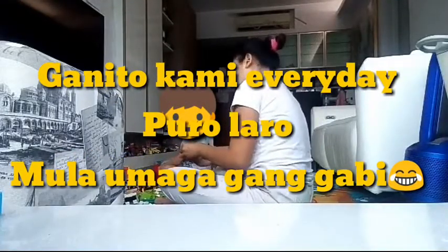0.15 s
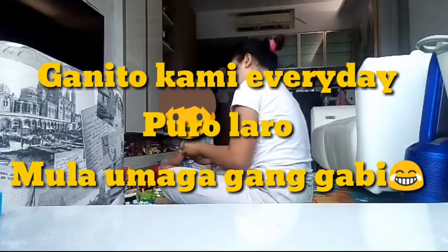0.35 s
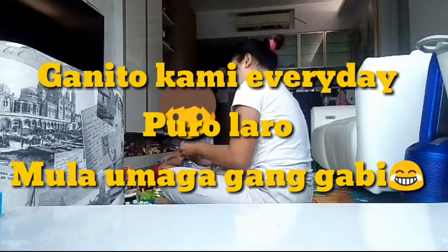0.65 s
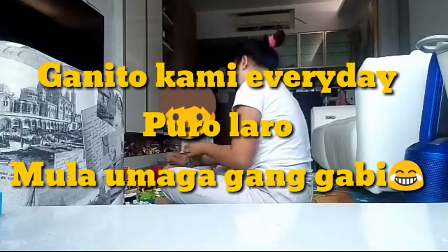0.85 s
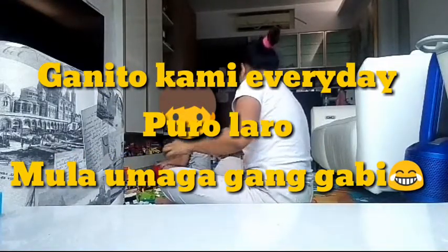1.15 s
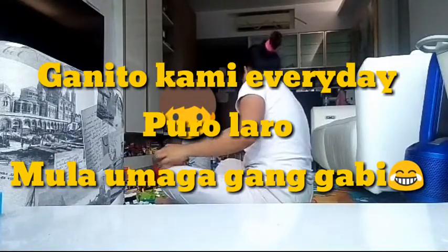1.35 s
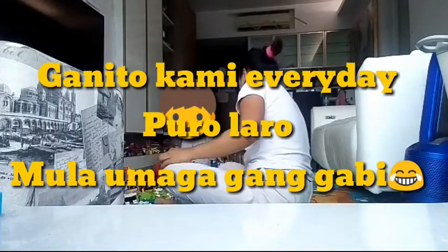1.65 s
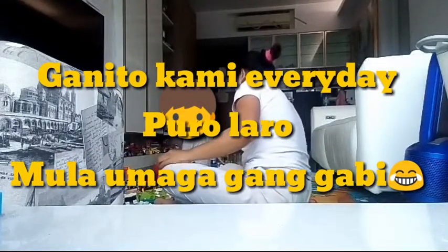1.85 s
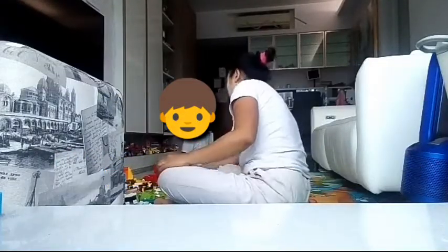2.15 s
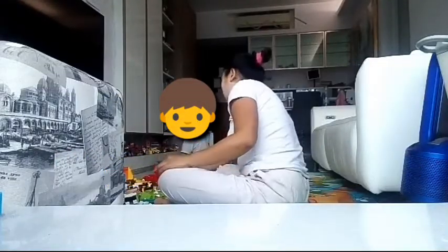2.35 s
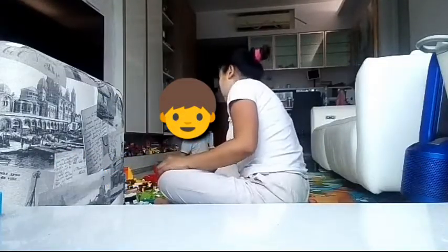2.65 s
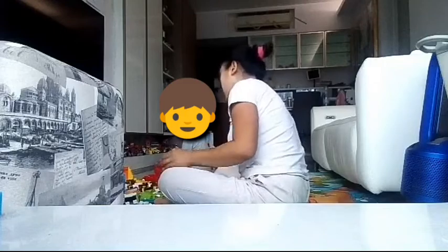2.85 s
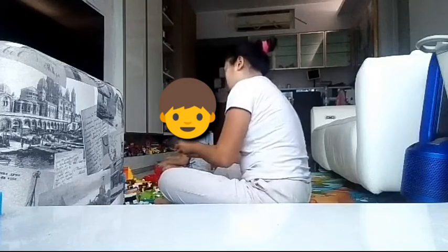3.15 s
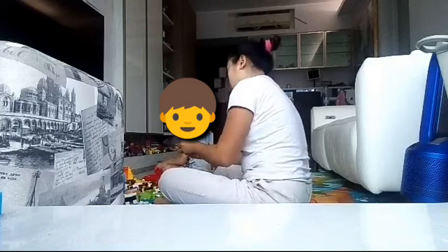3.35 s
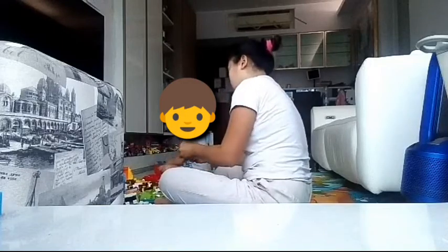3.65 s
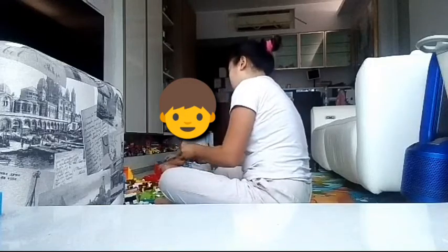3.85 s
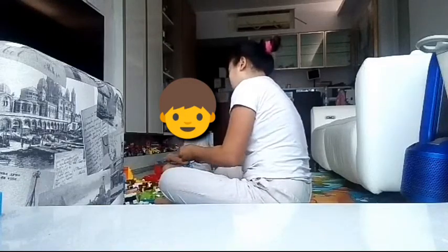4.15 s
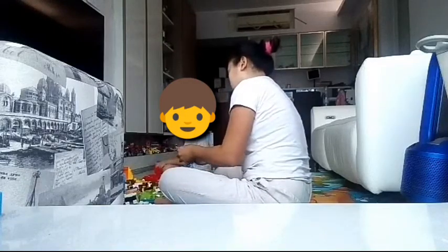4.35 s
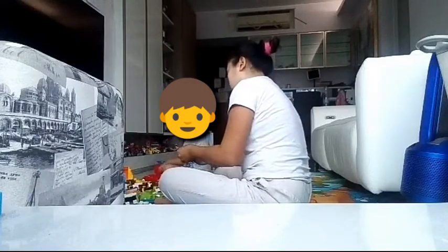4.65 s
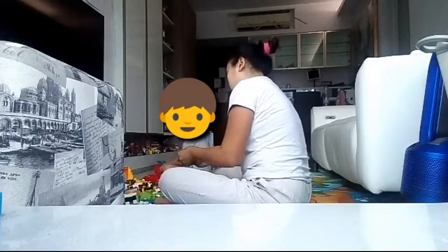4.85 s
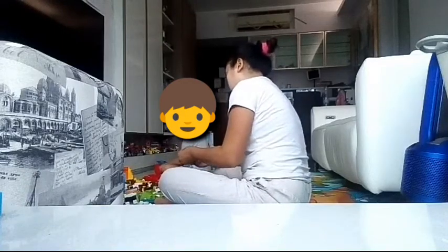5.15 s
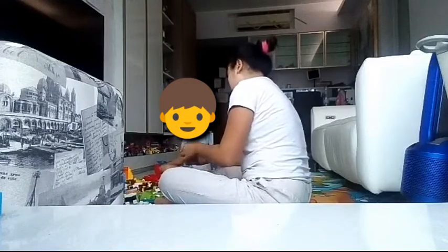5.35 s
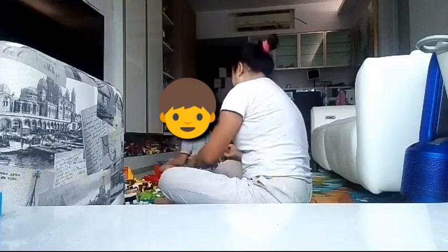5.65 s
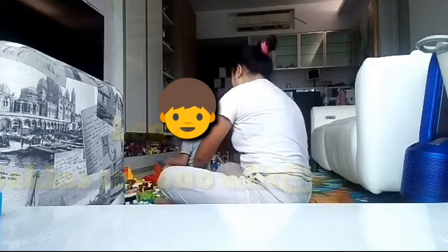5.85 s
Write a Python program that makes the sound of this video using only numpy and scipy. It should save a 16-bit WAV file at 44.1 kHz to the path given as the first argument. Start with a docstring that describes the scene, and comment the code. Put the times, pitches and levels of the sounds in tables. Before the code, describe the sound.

Over a steady low rumble of ventilation, plastic building bricks click and clatter in short, irregular bursts. Light ticks and a spill lead to one loud hollow knock, followed by a quick rummage, further little spills and snaps, and a last few knocks. The sound is slightly distant and leans strongly to the left, heard from a table a couple of metres away in a mildly echoing living room.

```python
"""Plastic toy bricks, picked through by hand on a living-room floor, two metres or so from a table.
Each brick cracks on contact and its shell rings briefly: handfuls drop and tumble, single bricks click,
ping or snap together, the pile is stirred and bumped, and now and then a large hollow piece knocks down.
The microphone is a phone on the table, its right port much the weaker. The table edge shades the direct
path, so most treble arrives by the ceiling and walls. Underneath lies a low ventilation rumble."""
import sys
import numpy as np
from scipy import signal
from scipy.fft import rfft, irfft, next_fast_len
from scipy.io import wavfile

SR = 44100
rng = np.random.default_rng(int(sys.argv[2]) if len(sys.argv) > 2 else 0)


def master_out(mix):
    """Clip the mix to full scale and print it as 16-bit PCM to the path in sys.argv[1]."""
    frames = np.transpose(np.atleast_2d(mix))
    ceiling = np.clip(frames, -1, 1)
    pcm = np.round(ceiling * 32767).astype(np.int16)
    wavfile.write(sys.argv[1], SR, pcm)


N = 265288
SPAN = SR // 4  # samples that one dry event may last
T = np.arange(SPAN) / SR

# spectrum of the ventilation: f/Hz, level/dB
AIR_SPECTRUM = [(20, -13.5), (36, -14), (56, 0.5), (90, -4.5), (135, -3.5), (200, -8), (500, -12.5),
                (700, -23.5), (1000, -26), (1290, -21), (1600, -41), (6500, -46.5), (8000, -62.5),
                (15500, -59.5)]
# low room resonances that the rumble excites: f/Hz, width/Hz, level/dB
ROOM_RESONANCES = [(60.8, 5.1, -13), (73.3, 7.1, -7), (105.4, 9.4, -8), (131.8, 10, -10.5),
                   (335.5, 50, -28)]
# early reflections at the microphone, ceiling first: delay/s, level/dB
REFLECTIONS = [(.0095, 1), (.0150, -11), (0.0241, -10.5), (0.0263, -10), (0.037, -29), (.0490, -10),
               (0.062, -9)]
# the phone's right port against its left: f/Hz, gain/dB
RIGHT_PORT_RESPONSE = [(60, -20), (350, -22.5), (700, -16.5), (1300, -22), (2400, -17), (5000, -18.5),
                       (15000, -13.5)]
# self-noise of the phone: f/Hz, level/dB
HISS_SPECTRUM = [(100, 2), (7000, 0), (8500, -7.5), (13500, 2), (15300, 9.5)]
# spectra of brick on brick, a thud on the floor and a scrape over it: f/Hz, level/dB
BRICK_SPECTRUM = [(150, -17), (600, -7), (1600, -6.5), (2400, -4.5), (3100, 0), (4500, 1), (5800, 4.5),
                  (6700, 1), (7600, -11.5), (8700, -17.5), (9500, -35), (10200, -22.5), (11800, -41.5),
                  (15500, -40)]
THUD_SPECTRUM = [(80, -31.5), (200, -0.5), (340, 2), (550, -0.5), (850, -1), (1250, -7.5), (1700, -11.5),
                 (3000, -22), (8000, -51)]
SCRAPE_SPECTRUM = [(100, -26), (250, 1.5), (450, -0.5), (800, 4.5), (1250, -0.5), (1700, -8.5), (2500, -14),
                   (5000, -25), (10000, -68)]
# hands and bricks bumping the floor: t/s, level/dB, f/Hz, relative jolt/dB
FLOOR_BUMPS = [(2.293, -45.5, 764, -15), (2.345, -39, 440, -8), (2.44, -43.5, 674, 1),
               (2.962, -43.5, 378, -16), (3.035, -51.5, 826, -10.5), (3.126, -42.5, 385, -5)]
# a large hollow piece set down: t/s, level/dB, f/Hz, relative thud/dB, thud f/Hz, relative jolt/dB
HOLLOW_KNOCKS = [(0.553, -49.5, 1180, 7, 590, -20), (1.598, -46.5, 1410, -2, 700, -5),
                 (1.647, -23.5, 1248, -9.5, 650, -7), (3.675, -42.5, 1350, -23, 700, -5.5),
                 (3.684, -41, 1045, 2.5, 908, -23), (5.085, -30, 1177, -1, 760, -2.5),
                 (5.4148, -33.5, 1250, -0.5, 773, -18), (5.4535, -39, 1180, -9, 710, -13)]
# the ring that lingers after a knock: f/Hz, level/dB, t60/s
LINGER_MODES = [(366, -6, 0.45), (487, -22, 0.97), (622, -6, 0.32), (723, -1, 0.15), (797, 5.5, 0.28),
                (1020, -21, 0.33), (1000, 1.5, 0.23), (1127, 4.5, 0.45), (1165, -18, 1), (1365, -1.5, 0.42),
                (1394, -0.5, 0.54)]
# a thin piece ringing: t/s, level/dB, f/Hz
THIN_PINGS = [(2.348, -40.5, 3140), (2.699, -52, 3120), (3.128, -54.5, 4740)]
# bricks joined in raised hands: t/s, level/dB, ring f/Hz, relative ring/dB, brightness/(dB/octave)
BRICK_SNAPS = [(0.5748, -49, 3650, -5.5, -6.5), (2.7075, -40.5, 6280, -11.5, 12),
               (4.124, -51, 3700, 1.5, -0.5), (4.919, -44.5, 2310, -4, -1)]
# single bricks nudged: t/s, level/dB, ring f/Hz, relative ring/dB, brightness/(dB/octave)
BRICK_NUDGES = [(.037, -72.5, 3340, -12, -12), (.523, -51, 6390, -2, 3), (1.571, -51.5, 6230, -22, -4),
                (2.343, -40, 5800, -22, 8), (2.54, -37, 5140, 0, 9.5), (2.701, -41, 5930, -13, 9.5),
                (3.511, -48, 3980, -10, -1), (4.895, -47.5, 4400, -8, -2), (5.31, -46, 4180, -5, -.5),
                (5.838, -72, 3720, -6, -5)]
# handfuls let fall on the pile:
# t/s, level/dB, ring f/Hz, brightness/(dB/octave), relative tumble/dB, tumble length/s, thud level/dB
HANDFULS = [(0.924, -48.5, 5700, 4, 1.5, 0.068, -56.5), (1.250, -31.5, 5740, 3, -1, .11, -48.5),
            (3.324, -35, 3530, 1.5, 0, .14, -41.5), (4.490, -34, 3550, 0, -3.5, .1, -52.5),
            (5.413, -41, 5570, 1, 3.5, 0.069, -56)]


def undb(db):
    """Decibels to gain."""
    return 10 ** (np.asarray(db) / 20)


def unit(x):
    """Scale to an energy of one."""
    return x / np.sqrt(np.sum(x ** 2) + 1e-18)


def colour(x, points, tilt_db=0):
    """Minimum-phase filter through points of f/Hz, gain/dB, tilted tilt_db an octave from 2 to 8 kHz."""
    size = 2 * next_fast_len(x.shape[-1] // 2 + 2048)
    octave = np.log2(np.maximum(np.fft.rfftfreq(size, 1 / SR), 1))
    hz, db = np.transpose(points)
    curve = np.interp(octave, np.log2(hz), db) + tilt_db * np.clip(octave - np.log2(4000), -1, 1)
    cepstrum = irfft(np.log(undb(curve)))
    cepstrum[1:size // 2] *= 2
    cepstrum[size // 2 + 1:] = 0
    return irfft(rfft(x, size) * np.exp(rfft(cepstrum)))[..., :x.shape[-1]]


def ring(hz, t60, t):
    """One decaying mode."""
    return np.sin(2 * np.pi * hz * t) * np.exp(-np.log(1000) * t / t60)


def add(out, s, sound, db):
    """Mix in a stereo sound; db is the left level with its energy spread over 50 ms."""
    start = max(int(s * SR), 0)
    gain = undb(db) * np.sqrt(SR / 20 / np.sum(sound[0] ** 2))
    out[:, start:start + sound.shape[1]] += gain * sound[:, :N - start]


def ventilation(air_db=-52, apart_db=-11):
    """Room tone: moving air rumbles and booms in the room, nearly alike at both ports."""
    shared, own = (unit(colour(rng.standard_normal(N), AIR_SPECTRUM)) for _ in range(2))
    for hz, width, db in ROOM_RESONANCES:
        boom = signal.lfilter(*signal.iirpeak(hz, hz / width, fs=SR), rng.standard_normal(N))
        shared = shared + undb(db) * unit(boom)
    return undb(air_db) * np.sqrt(N) * np.array([shared, shared + undb(apart_db) * own])


def room(x, sight_db=-19, shade_hz=1680, shaded_db=5.5, tail_db=12.5, t60=.52, build_s=.0098):
    """From brick to phone: round the table edge, by line of sight, by hard echoes and a diffuse tail."""
    t = np.arange(SR * 3 // 4) / SR
    direct = signal.unit_impulse(len(t))
    shaded = signal.sosfilt(signal.butter(4, shade_hz, fs=SR, output="sos"), direct)
    early = np.zeros((2, len(t)))
    for s, db in REFLECTIONS:
        # each echo comes from its own side, so it meets the two ports at different moments
        arrival_s = s + .0002 * rng.uniform(-1, 1, 2)
        early[[0, 1], (SR * arrival_s).astype(int)] += undb(db)
    swell = (1.15 - np.exp(-(t / build_s) ** 3)) * np.exp(-np.log(1000) * t / t60)
    patchy_db = 4 * np.exp(-t / .084)  # the first reflections are still separate, the late ones merge
    tails = [unit(rng.standard_normal(len(t)) * swell * undb(patchy_db * rng.standard_normal(len(t))))
             for _ in range(2)]
    response = undb(shaded_db) * shaded + undb(sight_db) * direct + early + undb(tail_db) * np.array(tails)
    return signal.fftconvolve(x[None], response, axes=1)


def thud(hz, loose_s=.0082, loose_db=-4, body_db=-3, body_t60=.031):
    """A dull push on the floor: one blow, a short boom, loose pieces shifting."""
    loose = unit(rng.standard_normal(SPAN) * np.exp(-T / loose_s))
    blow = unit(colour(signal.unit_impulse(SPAN) + undb(loose_db) * loose, THUD_SPECTRUM))
    return unit(blow + undb(body_db) * unit(ring(hz, body_t60, T)))


def knock(hz, thud_db, thud_hz, push_s=.0011, linger_db=-6, settle_s=.0031):
    """A hollow piece gives a few strong cycles, settles with a boxy thud and leaves a low ring."""
    blow = unit(T / push_s * np.exp(-T / push_s) * np.sin(2 * np.pi * hz * T))
    settle = np.pad(thud(thud_hz, body_db=-2, body_t60=.054), (int(settle_s * SR), 0))[:SPAN]
    heard = room(blow + undb(thud_db) * settle)
    t = np.arange(heard.shape[1]) / SR
    modes = sum(undb(db + 1.6 * rng.standard_normal()) * ring(f, t60, t) for f, db, t60 in LINGER_MODES)
    linger = (1 - np.exp(-t / .0037)) * modes  # builds up as the blow spreads
    return heard / np.linalg.norm(heard[0]) + undb(linger_db) * unit(linger)


def ping(hz):
    """A thin piece, free to vibrate, sounds one short mode in sight of the microphone."""
    return room(ring(hz, t60=.046, t=T), sight_db=5)


def contact(t60=.01, shell_db=-4, low_hz=2800, high_hz=9000, count=16):
    """One brick touching another: a sharp crack and the short modes of its shell."""
    t = T[:SR // 25]
    hz = low_hz * (high_hz / low_hz) ** rng.random((count, 1))
    shell = np.sum(rng.standard_normal((count, 1)) * ring(hz, t60, t), axis=0)
    return unit(signal.unit_impulse(len(t)) + undb(shell_db) * unit(shell))


def clatter(times, sizes, length):
    """Many contacts, each of a different brick."""
    out = np.zeros(length + SPAN)
    for s, size in zip(times, sizes):
        tick, start = contact(), int(np.clip(s * SR, 0, length))
        out[start:start + len(tick)] += size * tick
    return out[:length]


def strike(hz, ring_db, t60=.01, split=.051):
    """A firm contact makes one brick ring; its walls give three close modes."""
    crack = contact(shell_db=-10, count=24)
    walls = sum(weight * ring(hz * (1 + offset * split), t60, T)
                for offset, weight in ((-.97, -.084), (.33, .51), (.5, -.53)))
    return unit(np.pad(crack, (0, SPAN - len(crack))) + undb(ring_db) * unit(walls))


def snap(hz, ring_db, bright_db, seat_s=.001195, seat_db=-6):
    """Studs jump home and the brick seats just after: a sharp crack in sight of the microphone."""
    seat = clatter([seat_s], [undb(seat_db)], SPAN)
    return room(colour(strike(hz, ring_db) + seat, BRICK_SPECTRUM, bright_db), sight_db=8)


def click(hz, ring_db, bright_db, spill_s, spill_db, scatter_db=4, fade_db=4, count=12):
    """A brick lands and rings; its neighbours spill after it, fading unevenly."""
    when = (np.arange(count) + rng.random(count)) / count
    sizes = undb(scatter_db * rng.standard_normal(count) - fade_db * when)
    dry = strike(hz, ring_db) + undb(spill_db) * unit(clatter(when * spill_s, sizes, SPAN))
    return room(colour(dry, BRICK_SPECTRUM, bright_db))


def jolt(bright_db):
    """A blow shakes the loose bricks around it into a brief rattle."""
    return click(hz=6340, ring_db=-13, bright_db=bright_db, spill_s=.037, spill_db=-11.5)


def stroke(t, db, rise_s, hold_s, fall_db_per_s, start_db=-22):
    """Gain of one sweep of the hand: it gathers speed, keeps it and slows down."""
    rise_db = start_db * np.maximum(1 - t / rise_s, 0)
    fall_db = fall_db_per_s * np.maximum(t - rise_s - hold_s, 0)
    return undb(db + rise_db - fall_db)


def stir(length_s=.56, scatter_db=5, count=130):
    """Bricks rattle in the hand while those beneath scrape the floor; returns sound and level/dB."""
    length = int(length_s * SR)
    t = np.arange(length) / SR
    when = (np.arange(count) + rng.random(count)) / count * (length - 1)
    sizes = undb(scatter_db * rng.standard_normal((2, count)))
    rattle = unit(colour(clatter(when / SR, sizes[0], length), BRICK_SPECTRUM, tilt_db=-6))
    slips = np.zeros(length)
    slips[when.astype(int)] = sizes[1] * rng.choice([-1, 1], count)
    scrape = unit(colour(slips, SCRAPE_SPECTRUM))
    dry = rattle * stroke(t, db=-39.5, rise_s=.21, hold_s=.06, fall_db_per_s=100)
    dry += scrape * stroke(t, db=-43, rise_s=.06, hold_s=.05, fall_db_per_s=48)
    return room(dry), 10 * np.log10(np.sum(dry ** 2) * length / (SR / 20))


def nudges(graze_lead_s=.038, graze_db=-14):
    """Fingers graze a brick, then tip it against its neighbours."""
    out = np.zeros((2, N))
    for s, db, *brick in BRICK_NUDGES:
        add(out, s - graze_lead_s, click(*brick, spill_s=.044, spill_db=2), db + graze_db)
        add(out, s, click(*brick, spill_s=.042, spill_db=-3.5), db)
    return out


def drops(lag_s=.039, big_hz=3500, big_ring_db=-8, ring_db_per_octave=-18):
    """A handful's first bricks hit the pile with a thud, big ones ringing most; the rest tumble after."""
    out = np.zeros((2, N))
    for s, db, hz, bright_db, tumble_db, tumble_s, thud_db in HANDFULS:
        ring_db = big_ring_db + ring_db_per_octave * np.log2(hz / big_hz)
        add(out, s, click(hz, ring_db, bright_db, spill_s=.036, spill_db=-5), db)
        add(out, s, room(thud(hz=600)), thud_db)
        tumble = click(hz, ring_db=-12.5, bright_db=bright_db, spill_s=tumble_s, spill_db=1.5)
        add(out, s + lag_s, tumble, db + tumble_db)
    return out


def scene():
    """The handling of the bricks over the room tone, as it reaches the table."""
    out = ventilation() + drops() + nudges()
    add(out, 2.28, *stir())
    for s, db, hz, thud_db, thud_hz, jolt_db in HOLLOW_KNOCKS:
        add(out, s, knock(hz, thud_db, thud_hz), db)
        add(out, s, jolt(bright_db=-4.5), db + jolt_db)
    for s, db, hz, jolt_db in FLOOR_BUMPS:
        add(out, s, room(thud(hz)), db)
        add(out, s, jolt(bright_db=-6.5), db + jolt_db)  # a softer blow, a duller rattle
    for table, sound in ((BRICK_SNAPS, snap), (THIN_PINGS, ping)):
        for s, db, *brick in table:
            add(out, s, sound(*brick), db)
    return out


def record(dry, right_lead_s=.00094, top_hz=15600):
    """The phone: its right port is much weaker and slightly early; it adds faint hiss and cuts the top."""
    lead = int(right_lead_s * SR)
    right = colour(np.pad(dry[1], (0, lead))[lead:], RIGHT_PORT_RESPONSE)
    hiss = undb([-86, -80.5])[:, None] * colour(rng.standard_normal((2, N)), HISS_SPECTRUM)  # left, right
    top_cut = signal.ellip(10, .2, 70, top_hz, fs=SR, output="sos")
    return signal.sosfilt(top_cut, np.array([dry[0], right]) + hiss)


dry = scene()
out = record(dry)
master_out(out)
```